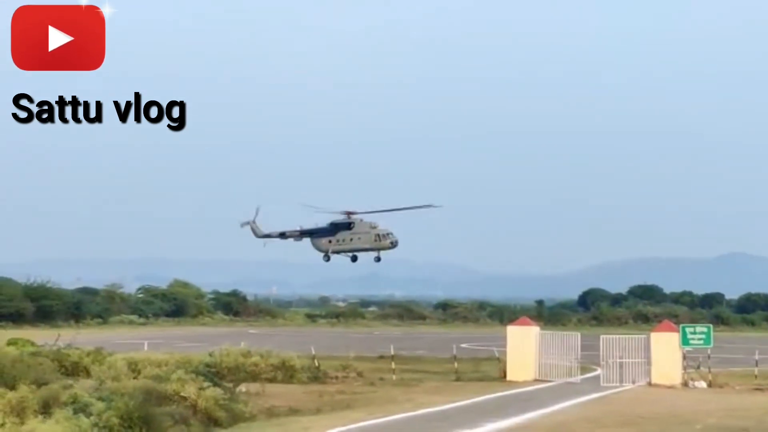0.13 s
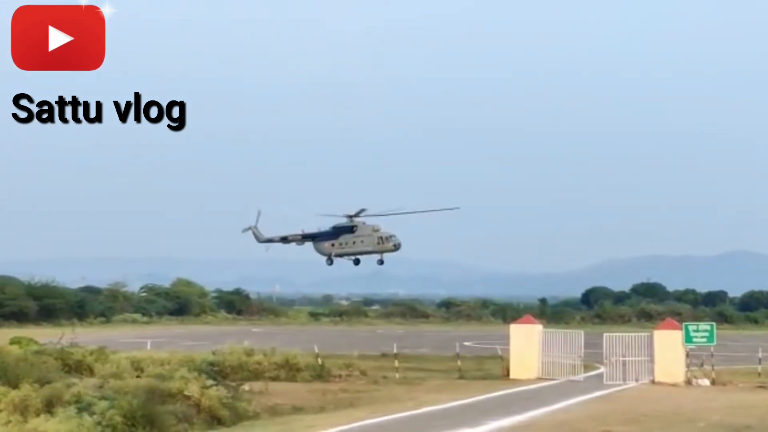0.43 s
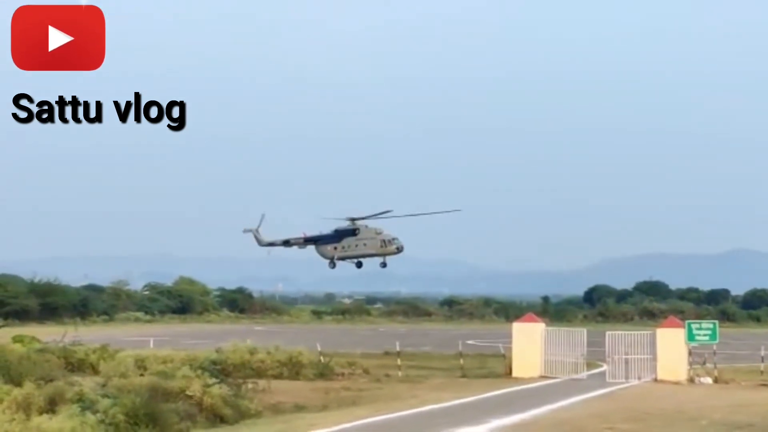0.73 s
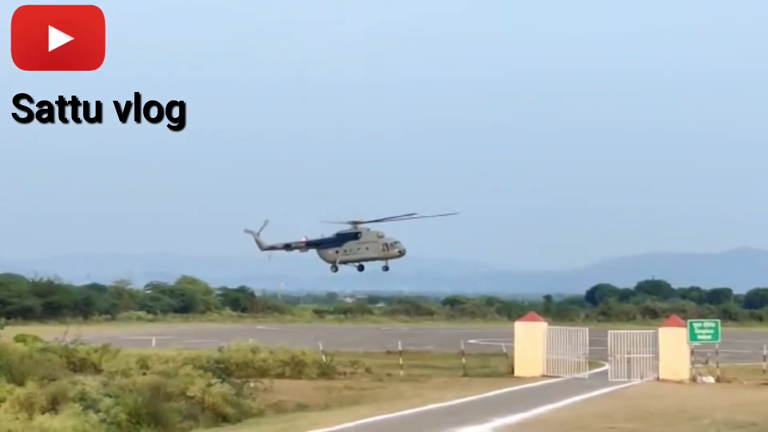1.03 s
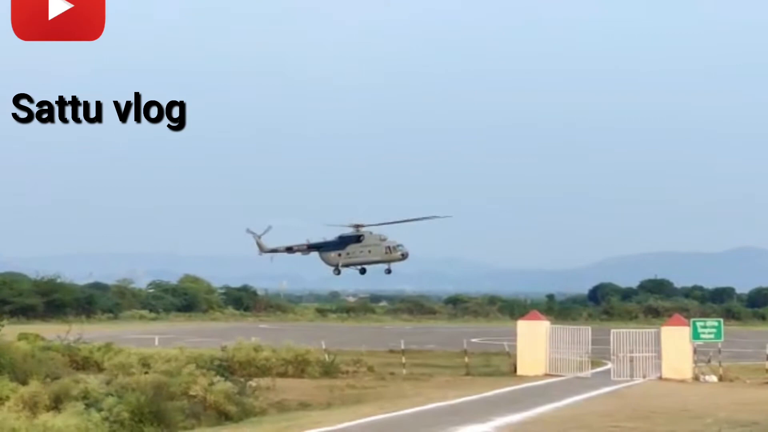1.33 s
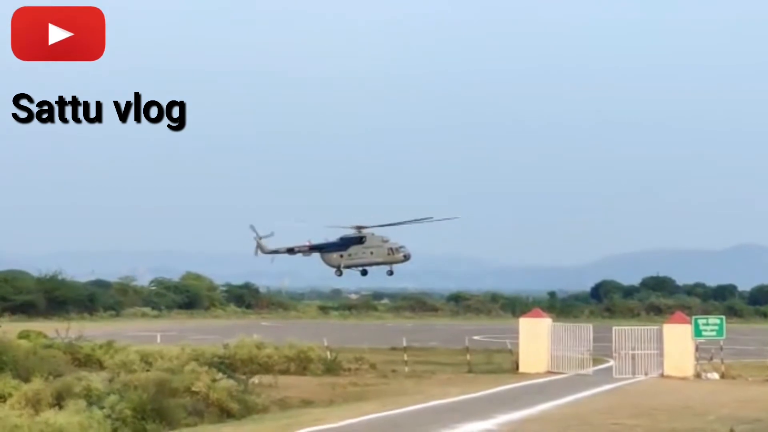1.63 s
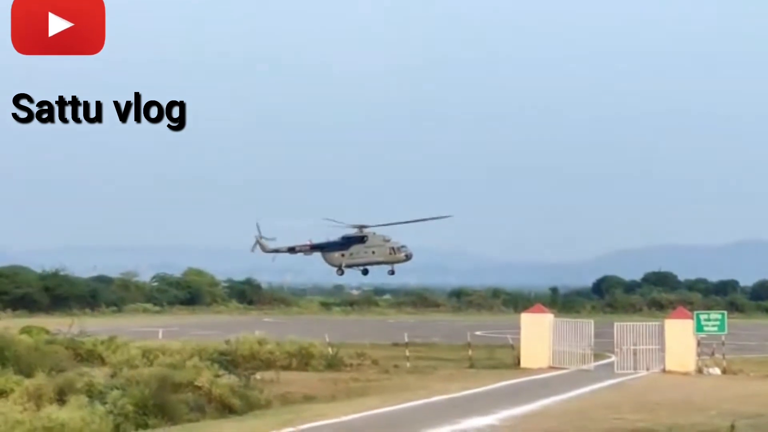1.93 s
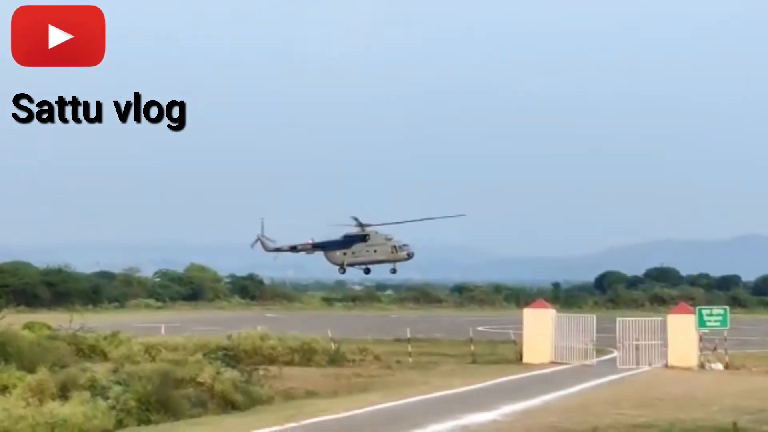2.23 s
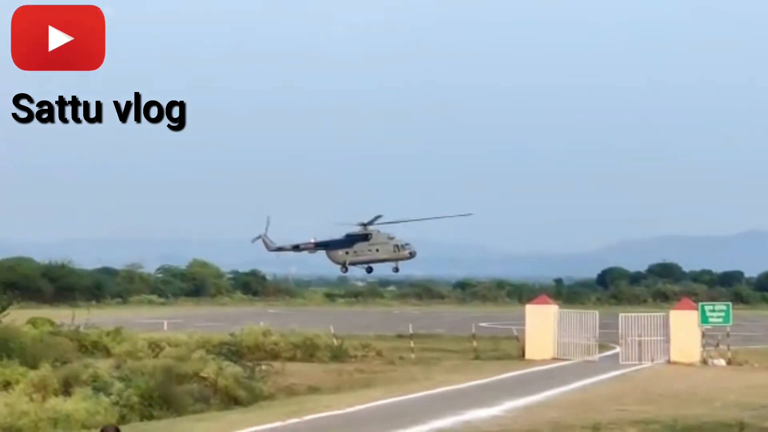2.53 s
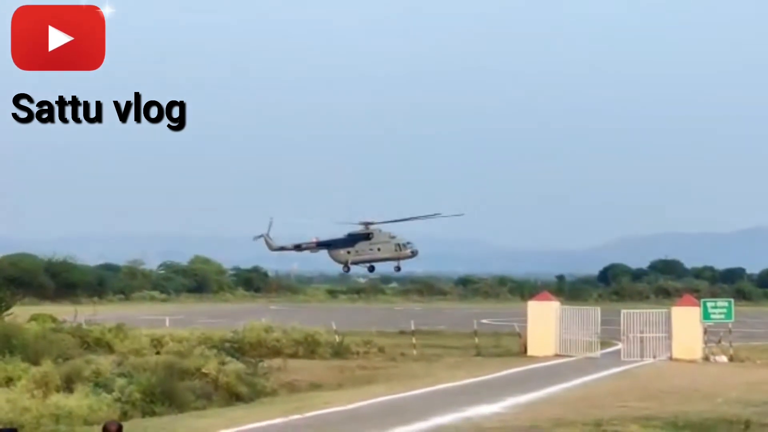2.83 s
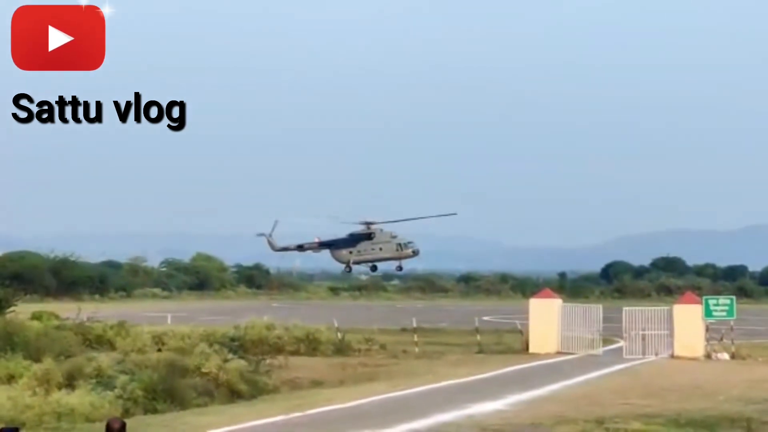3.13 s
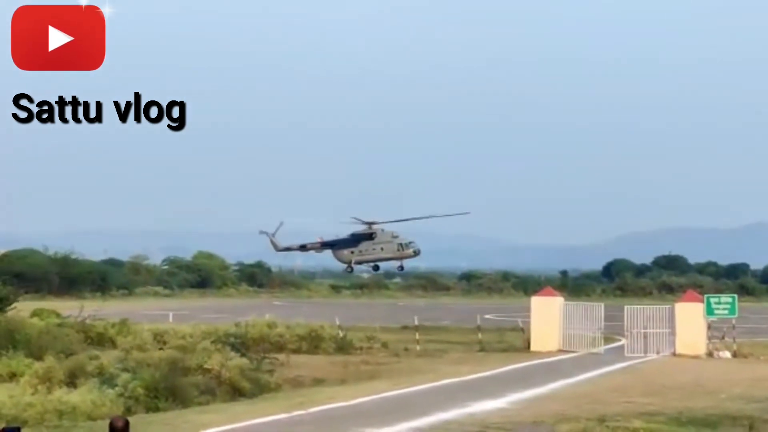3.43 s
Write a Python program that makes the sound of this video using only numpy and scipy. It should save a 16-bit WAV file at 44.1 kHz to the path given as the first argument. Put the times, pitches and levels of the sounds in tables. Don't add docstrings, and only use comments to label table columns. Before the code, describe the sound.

A helicopter hovers low, its steady engine roar chopped by rapid blade thumps and wind rumble.

```python
import sys
import numpy as np
from scipy import signal
from scipy.fft import rfft, irfft, next_fast_len
from scipy.io import wavfile
from scipy.ndimage import uniform_filter1d, map_coordinates

SR = 44100
rng = np.random.default_rng(int(sys.argv[2]) if len(sys.argv) > 2 else 0)


def int16_out(signal):
    q = np.round(np.clip(np.atleast_2d(signal).T, -1, 1) * 32767)
    wavfile.write(sys.argv[1], SR, q.astype(np.int16))


def rack_gain(trim_db):
    fader = np.asarray(trim_db, float)
    return 10 ** (fader / 20)


N = 158760
TIME = np.arange(N) / SR

BLADES, BLADE_HZ = 5, 16.02
SWISH_S, WHINE_S, TURN_S = 1.057, 2.476, 3.29


def unit(x):
    return x / np.sqrt(np.mean(x ** 2) + 1e-20)


def along(points, hz):
    f, v = np.transpose(points)
    return np.interp(np.log(hz + 1), np.log(f + 1), v)


def colour(points, hz):
    low_end = (points[0][0] / 2, -90)
    high_end = (points[-1][0] * 2, -90)
    return rack_gain(along([low_end, *points, high_end], hz))


def curves(rows):
    s, *columns = np.transpose(rows)
    return [np.interp(TIME, s, column) for column in columns]


def wobble(rate):
    knots = rng.standard_normal(int(N * rate / SR) + 4)
    return map_coordinates(knots, [np.arange(N) * rate / SR])


def beat(rate, peak_s, sharp):
    swell = np.exp(sharp * (np.cos(2 * np.pi * rate * (TIME - peak_s)) - 1))
    return swell - swell.mean()


def filtered(x, response):
    size = next_fast_len(N + SR // 2)
    return irfft(rfft(x, size) * response(np.fft.rfftfreq(size, 1 / SR)), size)[..., :N]


def rush(spectrum, alike, patchy_db):
    z = signal.stft(rng.standard_normal((2, N)), nperseg=512)[2]
    patches = uniform_filter1d(rng.standard_normal(z.shape[1:]), size=6, axis=0)
    patches = uniform_filter1d(patches, size=10, axis=1)
    pair = signal.istft(z * rack_gain(patchy_db * unit(patches)), nperseg=512)[1][:, :N]

    def mid_side(hz):
        angle = np.arccos(np.clip(along(alike, hz), -1, 1)) / 2
        return colour(spectrum, hz) * [np.cos(angle), np.sin(angle)]

    mid, side = filtered(pair, mid_side)
    return unit(np.array([mid + side, mid - side]))


# frequency in Hz, level in dB per Hz.
WIND_SPECTRUM = [(8, 9.5), (20, 6.5), (40, 5.5), (80, 0.5), (160, -12.5), (320, -19.5), (700, -19)]


def wind():
    wind_db, left_over_right_db = -9.5, 5.5
    gusts = rack_gain(1.5 * np.array([wobble(8), wobble(8)]))
    buffets = unit(gusts * rush(WIND_SPECTRUM, [(30, 0.4)], patchy_db=3.75))
    return rack_gain(wind_db) * rack_gain([[left_over_right_db / 2], [-left_over_right_db / 2]]) * buffets


# frequency in Hz, correlation from 0 to 1.
PORT_LIKENESS = [(60, 1), (300, 0.79), (700, 0.55), (1400, 0.31), (3000, 0.22), (7000, 0.16)]
# frequency in Hz, level in dB per Hz.
ROAR_SPECTRUM = [(60, -5), (150, -3), (330, -9), (520, -1.5), (930, -12.5), (1000, -17), (2500, -18),
                 (4500, -24)]
# frequency in Hz, level in dB per Hz.
HISS_SPECTRUM = [(2500, -20.5), (4000, -12), (5200, -8.5), (5850, -4.5), (6500, -9), (6900, -18),
                 (7300, -23), (8000, -60)]
# frequency in Hz, level in dB per Hz.
FIZZ_SPECTRUM = [(6000, -37), (7500, -1.5), (9500, -4), (11000, -6.5), (11600, -3), (12300, -11.5),
                 (13500, -14), (15900, -12)]


def engines(hiss_db, roar_db, swish_db, fizz_db, rumble_db):
    roar_base_db, fizz_base_db = -13, -14.5
    shaft_hz, shaft_db = 925, -36
    shared = 0.8 * wobble(9)
    chop = swish_db * beat(BLADE_HZ, SWISH_S, sharp=2.2) * (1 + 0.5 * wobble(17))
    exhaust = rush(ROAR_SPECTRUM, PORT_LIKENESS, patchy_db=1.01)
    upper = filtered(exhaust, lambda hz: hz ** 2 / (hz ** 2 + 600 ** 2))
    rumble = (exhaust - upper) * rack_gain(rumble_db)
    roar = rack_gain(roar_base_db) * (rumble + upper * rack_gain(roar_db + chop + shared))
    shaft_tone = np.sin(2 * np.pi * shaft_hz * TIME + 0.9 * wobble(6.1))
    shaft = rack_gain(shaft_db + 2.5 * wobble(2.3)) * shaft_tone
    turn = beat(BLADE_HZ / BLADES, TURN_S, sharp=0.77)
    hiss_gain = rack_gain(2.1 * turn + 0.31 * wobble(12))
    hiss = hiss_gain * rush(HISS_SPECTRUM, PORT_LIKENESS, patchy_db=2.1)
    fizz_gain = rack_gain(fizz_base_db + fizz_db + 1.2 * turn + 0.5 * wobble(11))
    fizz = fizz_gain * rush(FIZZ_SPECTRUM, PORT_LIKENESS, patchy_db=1.1)
    return roar + shaft + rack_gain(hiss_db) * (hiss + fizz)


def gearbox(whine_db):
    mesh_hz, casing_db = 1872, 7
    casing_spectrum = [(1600, -7), (1780, -4), (1890, -0.5), (2000, -9), (2300, -38)]  # Hz, dB per Hz
    swell = beat(BLADE_HZ, WHINE_S, sharp=1.0)
    tone = rack_gain(3 * swell) * np.sqrt(2) * np.sin(2 * np.pi * mesh_hz * TIME + 0.3 * wobble(7))
    casing = rack_gain(4.2 * swell) * rush(casing_spectrum, PORT_LIKENESS, patchy_db=2.0)
    return rack_gain(whine_db) * (tone + rack_gain(casing_db) * casing)


# multiple of the blade rate, level in dB.
TAIL_HARMONICS = [(1, -27), (2, -26), (3, -26), (4, -38), (5, -34), (6, -38), (7, -39)]


def tail_rotor():
    tail_hz = 56.5
    phase = 2 * np.pi * tail_hz * TIME + 0.24 * wobble(4)
    drone = np.zeros(N)
    for multiple, db in TAIL_HARMONICS:
        drone += rack_gain(db + 1.34 * wobble(4)) * np.sqrt(2) * np.sin(multiple * phase)
    return drone


# frequency in Hz, level in dB.
THUMP_SPECTRUM = [(16, 4), (40, -12), (130, -10), (190, 0), (300, -2), (350, -5), (500, -6), (640, -24)]


def blade_thumps():
    thump_db = -21
    phase = 2 * np.pi * BLADE_HZ * (TIME - SWISH_S) + 0.028 * wobble(3.45)
    thump = np.zeros(N)
    for k in range(1, 40):
        level = colour(THUMP_SPECTRUM, k * BLADE_HZ) * rack_gain(2 * wobble(3))
        thump += level * np.sin(k * phase - 0.05 * k * k)
    return rack_gain(thump_db) * unit(thump)


# start in seconds, peak level in dB.
WAKE_SLAPS = [(0.067, -7), (0.812, -11), (0.936, -12), (1.111, -16), (1.238, -8.5), (1.425, -13),
              (1.555, -12), (1.676, -4.5), (1.737, -7), (1.83, -7.5), (1.896, -9.5), (1.959, -6),
              (2.039, -6), (2.093, -8), (2.213, -5), (2.277, -27), (2.338, -11), (2.401, -4.5), (2.462, -4),
              (2.526, -5.5), (2.588, -10), (2.651, -3.5), (2.711, -4.5), (2.774, -8), (2.838, -3.5),
              (2.9, -9)]


def blade_slaps():
    slap_hz, slap_s, slap_db = 820, 0.0009, 5
    around = np.arange(-300, 500) / SR
    slaps = np.zeros(N + 800)

    def wavelet(s, hz):
        return -np.exp(-(s / slap_s) ** 2 / 2) * np.cos(2 * np.pi * hz * s)

    for (start_s, db), (shift, echo) in zip(WAKE_SLAPS, rng.random((len(WAKE_SLAPS), 2))):
        hz = slap_hz * (0.75 + 0.15 * shift)
        slap = wavelet(around, hz) + 0.5 * echo * wavelet(around - 0.004, hz)
        first = round((start_s + 0.0015) * SR) - 300
        slaps[first:first + 800] += rack_gain(db + slap_db) * slap
    return slaps[:N]


def reflection(hz, delay_s, share, corner_hz):
    return share / (1 + (hz / corner_hz) ** 4) * np.exp(-2j * np.pi * hz * delay_s)


# time in seconds, hiss level in dB, roar level in dB, swish depth in dB,
# whine level in dB, fizz level in dB, rumble level in dB.
HOVER_EFFORT = [(0, -17.5, 3, 6, -32, 2.5, 3.5), (.2, -20.5, 1, -3, -35, 3, 4),
                (.45, -21, -0.5, 3.5, -36, 3, 4), (.8, -21.5, -0.5, 5.5, -34, 2.5, -0.5),
                (1.1, -21, -1.5, 4.5, -38, 0.5, -2.5), (1.4, -21.5, -2, 3.5, -30.5, 0, -2.5),
                (1.7, -20.5, 0.5, 3, -33, 0, -0.5), (2, -19.5, 1, 0.5, -34, 1.5, 1.5),
                (2.3, -20.5, 1.5, 1, -30.5, 0.5, 2), (2.6, -20, -1.5, -3.5, -28, -0.5, 3),
                (2.9, -18.5, 1, 2, -32, -0.5, 2), (3.15, -17.5, 0.5, 5.5, -28.5, -1.5, 3),
                (3.3, -15.5, -1, 4.5, -30, -1, 1), (3.6, -17, -2, 8, -27, -3, 0.5)]
# frequency in Hz, gain in dB.
PORT_BALANCE = [(200, 3), (400, 0), (650, 2.5), (1000, 1), (2000, -1.5), (4000, -2), (5800, 4), (8000, -1)]


def scene():
    lead_s = 0.00012
    hiss_db, roar_db, swish_db, whine_db, fizz_db, rumble_db = curves(HOVER_EFFORT)
    craft = engines(hiss_db, roar_db, swish_db, fizz_db, rumble_db) + gearbox(whine_db)
    craft = craft + tail_rotor() + blade_thumps() + blade_slaps()
    side = np.array([[1], [-1]]) / 2

    def paths_to_ports(hz):
        ground = reflection(hz, 0.00086, 0.5, 2400)
        bank = reflection(hz, 0.00181, -0.22, 2300)
        ports = rack_gain(side * along(PORT_BALANCE, hz)) * np.exp(2j * np.pi * hz * side * lead_s)
        return (1 + ground + bank) * ports

    return wind() + filtered(craft, paths_to_ports)


# frequency in Hz, threshold in dB over the usual
THIN_THRESHOLD = [(2500, -24), (6500, -10), (7300, 3), (8500, -.5), (11500, .5), (12500, 8.5), (15700, 11),
                  (15900, 40)]


def thinned(x):
    scatter_db = 5
    hz, _, z = signal.stft(x, SR, window="cosine", nperseg=2048)
    usual = uniform_filter1d(np.median(np.abs(z), axis=(0, 2)), size=16)[:, None]
    bands = rng.standard_normal((len(hz) // 20 + 1, z.shape[2]))
    bands = unit(uniform_filter1d(bands, size=2, axis=1))
    scatter = scatter_db * np.repeat(bands, 20, axis=0)[:len(hz)]
    threshold = usual * rack_gain(along(THIN_THRESHOLD, hz)[:, None] + scatter)
    return signal.istft(z * (np.abs(z) > threshold), SR, window="cosine", nperseg=2048)[1][:, :N]


def roll_off(x):
    return signal.sosfilt(signal.butter(12, 15990, fs=SR, output="sos"), x)


def record(dry):
    ceiling, hardness = 1.002, 7
    clipped = dry / (1 + np.abs(dry / ceiling) ** hardness) ** (1 / hardness)
    return roll_off(thinned(clipped))


dry = scene()
out = record(dry)
int16_out(out)
```